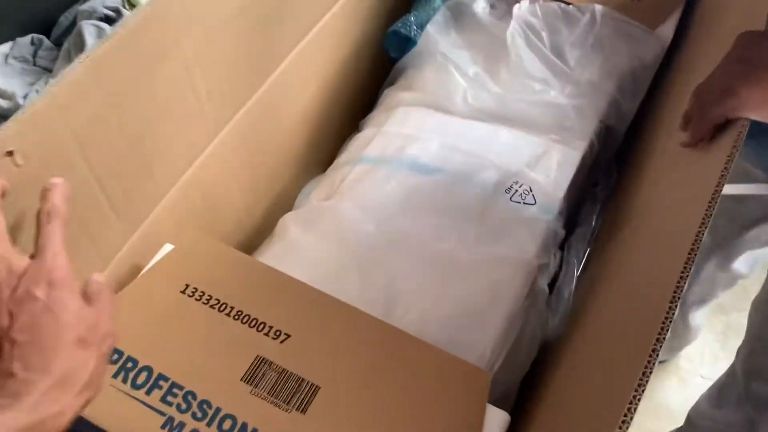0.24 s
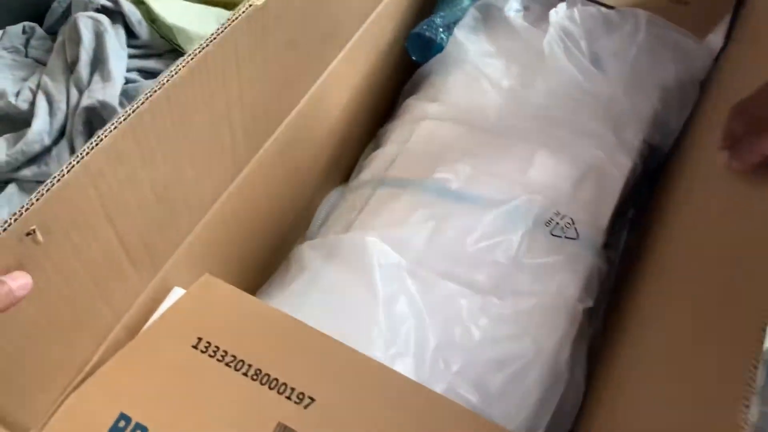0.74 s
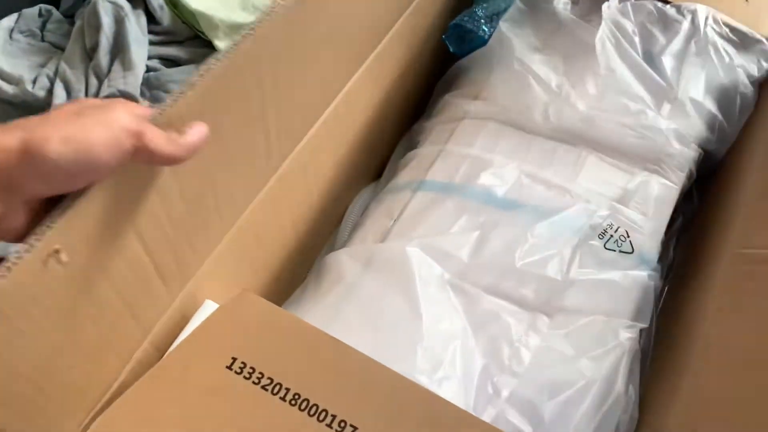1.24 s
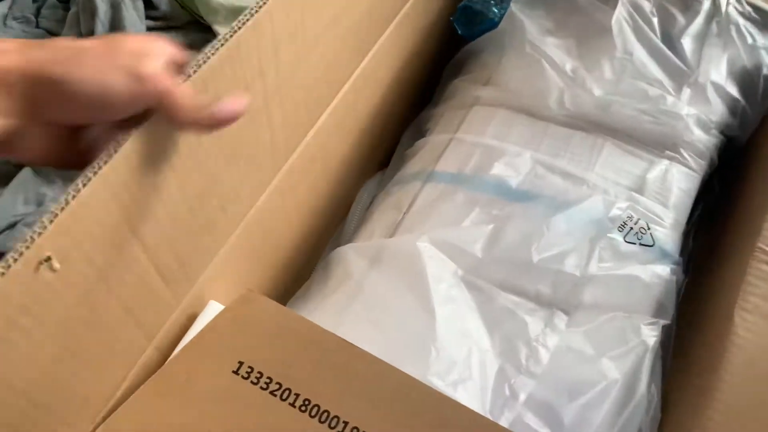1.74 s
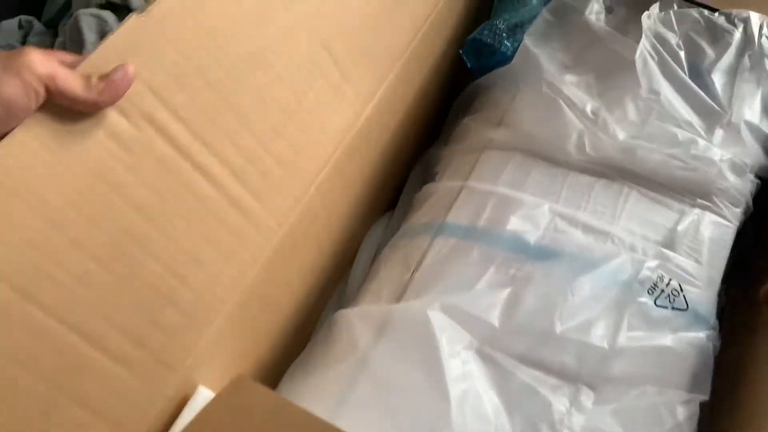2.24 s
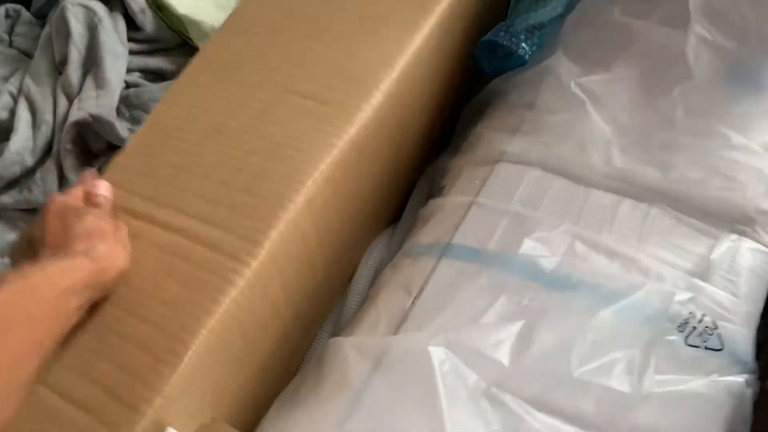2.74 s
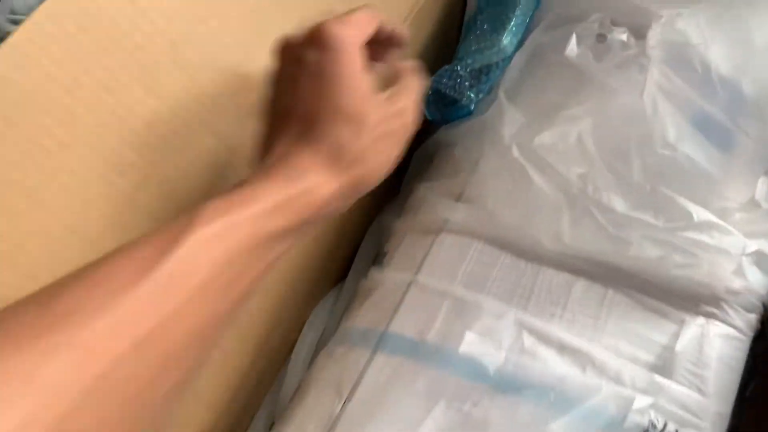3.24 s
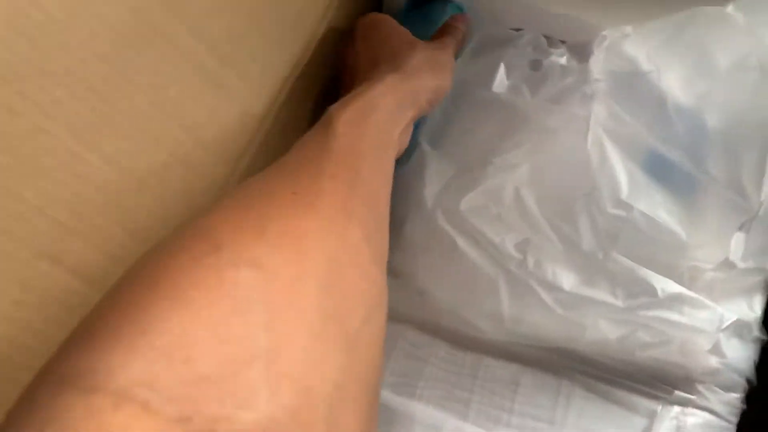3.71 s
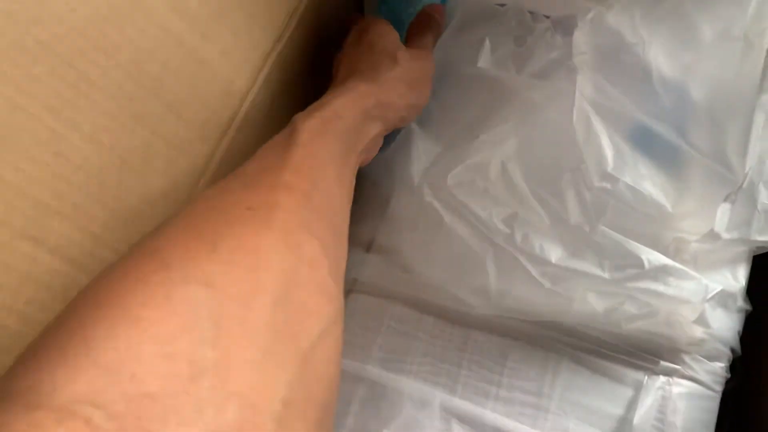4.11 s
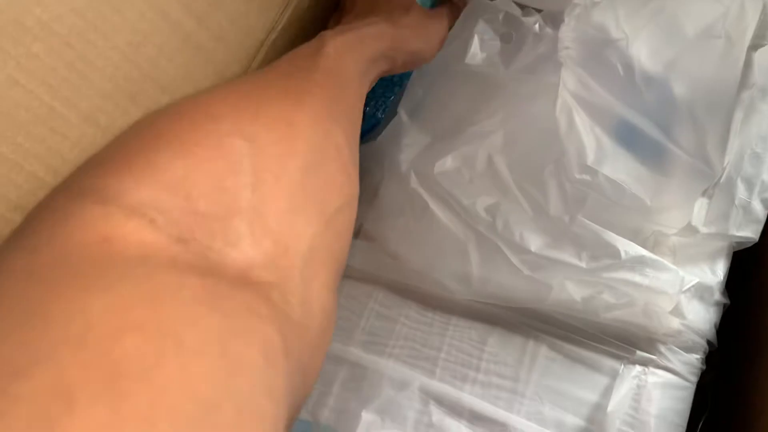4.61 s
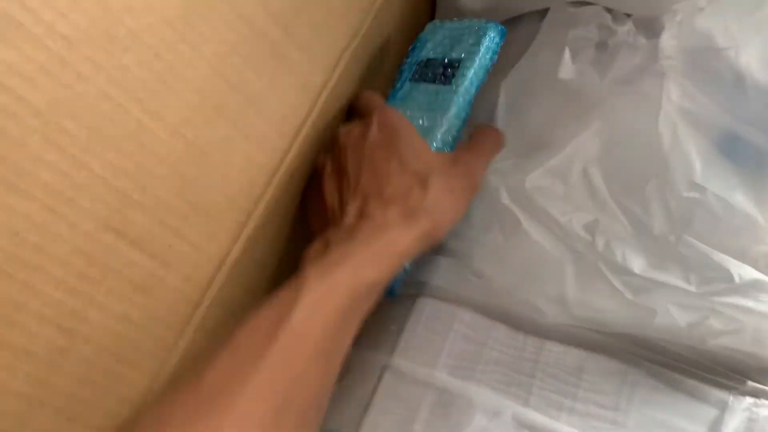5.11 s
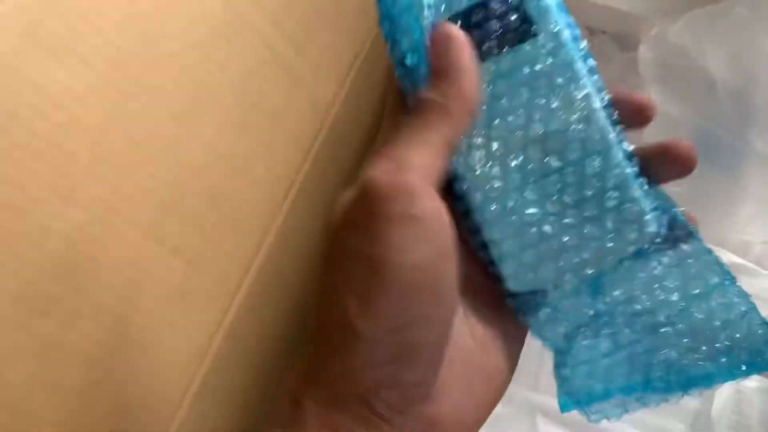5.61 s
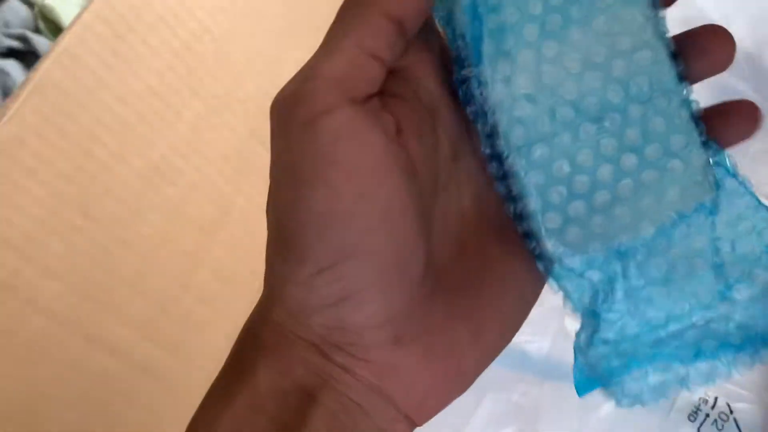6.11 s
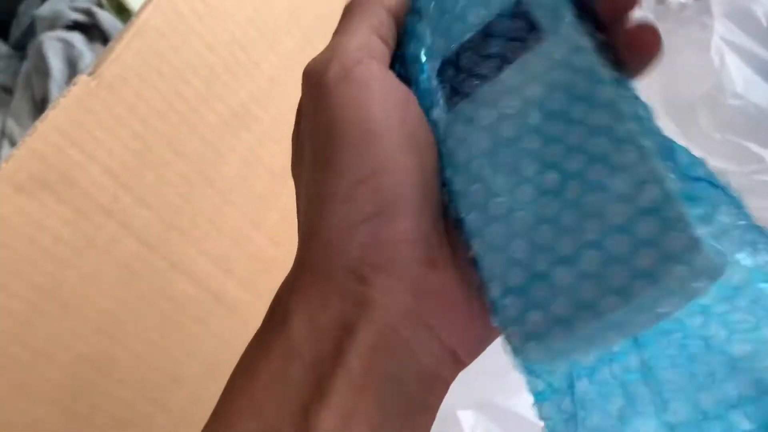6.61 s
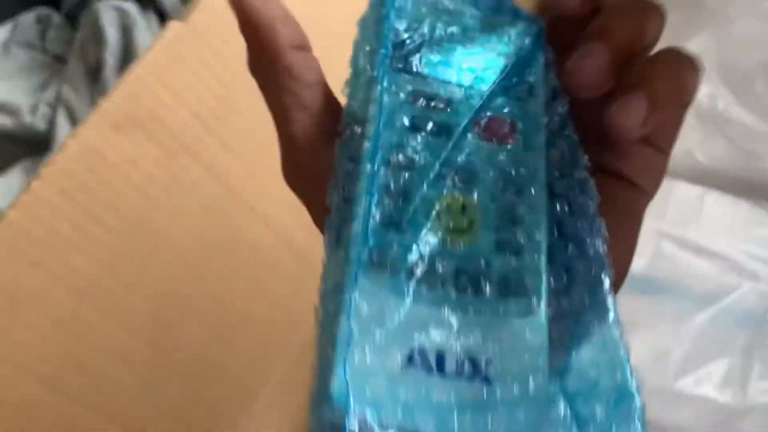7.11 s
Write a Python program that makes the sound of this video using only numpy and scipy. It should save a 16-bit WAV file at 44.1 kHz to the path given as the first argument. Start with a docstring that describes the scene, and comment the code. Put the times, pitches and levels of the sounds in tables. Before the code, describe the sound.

Close, uneven rustling of plastic sheeting mixes with cardboard scrapes and dull, boomy knocks as a box is pushed open by hand. Two quick bubble wrap pops are followed by a louder third and a few thumps. After that the wrap is handled with a crisp crackle, finishing on several rubs and one snap. The small room sounds dry and muted, with a low rumble throughout.

```python
"""Hands unpack a cardboard box in a soft-furnished room, close to one microphone.
From the start, film crinkles and snaps as creases flip, skin slides on the flaps, and the box walls
scuff and boom under shoves and knocks. From 2.3 s a cupped hand rubs the wrap now and then, ringing
a hollow. At 4.1-4.7 s three bubble-wrap pockets burst; from 4.9 s the stiffer wrap crackles in the hand.
A run of rubs and a snap end it at 7.3 s. Throughout: a short, dull room tail and a deep rumble."""
import sys
import numpy as np
from scipy import signal
from scipy.fft import rfft, irfft, next_fast_len
from scipy.io import wavfile

SR = 44100
rng = np.random.default_rng(int(sys.argv[2]) if len(sys.argv) > 2 else 0)


def wav_out(sig):
    """Save sig, one row per channel (or a flat mono array), as 16-bit PCM at SR to the path in sys.argv[1]."""
    wavfile.write(sys.argv[1], SR, np.round(np.clip(np.atleast_2d(sig).T, -1, 1) * 32767).astype(np.int16))


N = 324135

# hand movements: (full-speed time [s], run-up [s], hold [s], film level [dB], skin level [dB])
HAND_STROKES = [(.085, 0.017, 0.053, -51, -51.5), (.215, 0.025, 0.2, -47, -50),
                (.535, 0.11, 0.017, -44, -44.5), (.835, 0.072, 0.18, -41.5, -37.5),
                (1.137, 0.022, .25, -44.5, -54), (1.6, 0.11, 0.021, -52, -53),
                (1.72, 0.17, 0.035, -37.5, -34), (1.946, 0.32, 0.048, -49, -54),
                (2.14, 0.044, 0.004, -47, -43), (2.325, 0.18, 0.005, -46, -37.5),
                (2.44, 0.012, 0.046, -38.5, -64), (2.525, 0.038, 0.009, -29, -45),
                (2.69, 0.17, 0.037, -26.5, -42), (2.85, 0.035, 0.15, -41.5, -50),
                (3.322, 0.057, 0.0089, -50.5, -55), (3.43, 0.0096, 0.013, -49, -44),
                (3.69, 0.17, 0.0062, -43.5, -49), (3.975, 0.15, 0.0091, -43, -59),
                (4.49, 0.34, 0.011, -38.5, -54), (4.61, 0.14, 0.01, -37, -49),
                (4.87, 0.28, 0.04, -30, -39.5), (5.014, 0.27, 0.0045, -32, -59),
                (5.073, 0.031, 0.0015, -37, -44), (5.208, .1, 0.14, -37.5, -51),
                (5.388, 0.033, 0.015, -33, -53), (5.53, 0.39, 0.031, -41, -39),
                (5.86, 0.16, 0.061, -40.5, -44.5), (6.24, 0.16, 0.019, -36.5, -50),
                (6.4, 0.14, .2, -40.5, -49), (6.72, 0.11, 0.0076, -35.5, -50),
                (7.214, 0.042, 0.024, -35, -41), (7.34, 0.12, .02, -49, -29.5)]
# floor between strokes: (time [s], film level [dB], skin level [dB])
STROKE_FLOOR = [(0, -64, -86), (.5, -60, -53.5), (1.502, -58, -55.5), (2.4, -50.5, -56), (3.0, -45, -49.5),
                (3.2, -62, -55), (3.7, -46, -51), (4.25, -47, -55.5), (4.7, -60, -50), (5.12, -48, -81),
                (5.72, -45, -64), (6.0, -45, -49), (6.8, -32.5, -45.5), (7.1, -42, -50), (7.35, -54, -42)]
# film crinkle: (frequency [Hz], level [dB])
FILM_SPECTRUM = [(700, -12.5), (1500, -6), (3000, -4), (6000, -4.5), (9000, -2.5), (13000, -2.5),
                 (16000, -2.5)]
# creases flipping: (time [s], level [dB], centre [Hz])
CREASE_SNAPS = [(0.069, -35, 6040), (0.3196, -20, 5350), (0.322, -19, 6820), (0.34, -24, 3930),
                (0.482, -23, 5230), (0.497, -19, 4600), (0.5097, -14, 3530), (0.52, -18, 2560),
                (0.539, -23, 5200), (1.111, -35.5, 7500), (1.1335, -20.5, 3870), (1.3568, -18.5, 2000),
                (1.5643, -24.5, 4930), (1.603, -6, 7340), (2.1817, -30, 8900), (2.5045, -17, 6780),
                (2.601, -11, 7500), (2.677, -10, 8050), (3.061, -28, 2420), (3.6525, -27, 3950),
                (4.219, -31, 6500), (4.395, -23.5, 3860), (4.581, -19, 3680), (4.938, -9, 8000),
                (5.02, -12.5, 6660), (5.6305, -22, 3970), (6.189, -21, 8820), (6.4708, -27, 4260),
                (6.715, -24, 5500), (7.3197, -7.5, 2100)]
# air pockets bursting: (time [s], level [dB], torn-film mode [Hz])
BUBBLE_POPS = [(4.0586, -6.5, 8300), (4.1173, -5, 9400), (4.7343, 0.5, 7200)]
# modes common to all pockets: (frequency [Hz], width [Hz], level [dB])
POCKET_MODES = [(1330, 780, -2), (4670, 2900, -0.5), (13500, 4600, -13)]
# blows on the box: (time [s], level [dB], panel mode [Hz], T60 [s], hollow re boom [dB])
BOX_KNOCKS = [(0.221, -33.5, 300, 0.064, -3), (.323, -27, 205, 0.049, -1), (0.341, -21, 86.5, 0.055, -11),
              (0.511, -19.5, 150, 0.078, -16), (.535, -29.5, 255, 0.095, -13),
              (0.895, -30.5, 118, 0.16, -19), (1.141, -27.5, 320, 0.085, -6),
              (1.297, -23.5, 147, 0.12, -28), (1.339, -32, 153, 0.042, 5), (1.362, -10.5, 252, 0.061, -16),
              (1.397, -18, 140, 0.055, -17), (1.422, -14.5, 266, 0.08, -31), (1.568, -18, 290, 0.073, -16),
              (1.604, -10, 178.5, 0.034, -39), (1.945, -37.5, 309, 0.2, 4), (2.04, -28.5, 272, 0.076, -35),
              (2.211, -28, 103, 0.055, -14), (2.333, -46, 250, 0.027, 4), (2.426, -31, 112, 0.24, -7),
              (3.345, -35, 257, 0.23, -6), (3.416, -12, 186, 0.042, -5), (3.497, -27, 116.5, 0.099, 2.5),
              (3.525, -34, 197, 0.083, 8), (4.056, -26, 239, 0.089, 1), (4.116, -22.5, 238, 0.051, -1),
              (4.161, -9, 199, 0.036, -30), (4.184, -10.5, 75, 0.029, -43), (4.333, -23, 90.5, 0.063, -42),
              (4.832, -17.5, 271, 0.055, -2.5), (4.847, -9.5, 221, 0.057, -5.5),
              (4.922, -8.5, 131, 0.024, -29), (5.425, -18, 84.4, 0.097, 3), (5.811, -36, 249, 0.12, 5)]
# walls and cavity: (frequency [Hz], width [Hz], level [dB])
BOX_MODES = [(95, 27, 0), (182, 57, -4.5), (242.5, 58, 1), (353, 440, -13)]
# air space and flaps under a hard knock: (frequency [Hz], width [Hz], level [dB])
HOLLOW_MODES = [(445, 70, 7.5), (880, 516, 9.5), (1080, 460, 10.5), (1380, 560, -1.5)]
# shoves and tugs: (full-force time [s], run-up [s], hold [s], scuff level [dB], boom level [dB])
BOX_SHOVES = [(.09, 0.24, 0.18, -62.5, -47.5), (.34, 0.15, 0.093, -43, -39.5),
              (.512, 0.017, 0.027, -39.5, -31.5), (1.33, 0.2, 0.088, -41, -32),
              (1.6, 0.021, .01, -42.5, -38), (1.95, 0.055, 0.014, -51, -49.5),
              (2.14, 0.15, 0.087, -46, -43), (2.335, 0.088, 0.0092, -42, -33.5),
              (2.46, 0.15, 0.094, -39.5, -41), (2.69, 0.048, 0.044, -34, -33),
              (2.86, 0.087, 0.078, -65, -43.5), (3.2, 0.12, 0.011, -41.5, -61),
              (3.43, 0.045, 0.21, -54, -46.5), (3.95, 1, 0.016, -49.5, -67), (4.445, 0.15, 0.088, -48, -44),
              (4.852, 0.06, 0.039, -34, -26), (5.2, 0.9, 0.048, -45, -52), (5.433, 0.01, 0.0094, -69, -29),
              (5.57, 0.07, 0.017, -42, -45), (5.822, 0.034, 0.043, -41.5, -43.5),
              (6.016, 0.04, .02, -50.5, -44.5), (6.63, 0.083, 0.01, -31.5, -42.5),
              (7.169, 0.16, 0.0058, -46.5, -35), (7.32, 0.078, .03, -33.5, -28)]
# floor between shoves: (time [s], scuff level [dB], boom level [dB])
SHOVE_FLOOR = [(0, -58, -74), (1.0, -53.5, -54), (2.0, -51.5, -55), (3.0, -52.5, -46), (4.1, -60, -55),
               (4.7, -40.5, -45), (5.3, -55.5, -53), (6.2, -57, -55), (6.75, -49, -47.5),
               (7.0, -55.5, -57.5), (7.35, -35, -41)]
# cardboard scuff: (frequency [Hz], level [dB])
BOARD_SPECTRUM = [(250, -9), (450, 3), (900, 3), (1500, 0.5), (2500, -6), (4500, -8)]
# skin on the flaps: (frequency [Hz], level [dB])
SKIN_SPECTRUM = [(1500, -34), (3300, -17), (5400, -2), (7300, 0), (9500, -8), (16500, -24)]
# cupped hand on the wrap: (time [s], length [s], hollow mode [Hz], level [dB])
HAND_RUBS = [(2.296, 0.057, 900, -40.5), (2.8, 0.13, 500, -45), (2.955, 0.014, 2940, -40.5),
             (3.184, 0.065, 3220, -50.5), (4.795, 0.083, 2500, -35.5), (4.95, 0.11, 158, -37.5),
             (4.97, .115, 795, -45.5), (5.81, 0.077, 498, -40), (5.808, 0.11, 1110, -48.5),
             (6.005, 0.05, 624, -47.5), (6.611, 0.058, 590, -32), (7.15, 0.057, 313, -35),
             (7.238, 0.017, 1380, -32), (7.262, 0.05, 805, -29), (7.297, 0.053, 1490, -24.5),
             (7.245, 0.14, 340, -30.5), (7.314, 0.036, 1970, -26.5), (7.312, 0.036, 610, -25.5)]
# hands stop: (start [s], length [s], drop [dB])
HAND_PAUSES = [(0.417, 0.058, 9), (2.15, 0.036, 8), (2.35, 0.064, 11), (4.2, 0.059, 5.5), (5.107, 0.044, 4)]
# deep rumble: (time [s], level [dB])
RUMBLE_LEVELS = [(0.0, -45.5), (0.35, -47), (1.0, -52.5), (1.23, -45.5), (2.41, -49.5), (3.7, -43.5),
                 (3.93, -53.5), (4.15, -36.5), (4.36, -54.5), (4.95, -29), (5.08, -55), (5.95, -41),
                 (6.04, -50), (7.35, -50.5)]


def film_crinkle(rate_per_s=600, spread_db=2.5, wrap_lifted_s=4.93):
    """Small creases flip at random pitches over friction hiss; less hiss once the wrap is lifted."""
    flips = impulse_sizes(spread_db) * (rng.random(N) < rate_per_s / SR)
    band = rng.integers(0, 7, N)
    ticks = sum(resonance(flips * (band == k) + 1e-18, hz, 0.53 * hz) / np.sqrt(hz)
                for k, hz in enumerate(np.geomspace(3800, 14500, num=7)))
    clumps = from_db(1.83 * drift(rate_hz=52))
    hiss = np.where(np.arange(N) / SR < wrap_lifted_s, 2.5, 1.3) * rng.standard_normal(N)
    return coloured(clumps * (rms_one(ticks) + hiss), FILM_SPECTRUM, patch_db=1.76, patch_hz=3.7)


def crease_snaps(size=2000):
    """A crease flips: a broad crack around its own pitch, sharp front, short tail."""
    out = np.zeros(N)
    tail = decay(t60_s=0.011, rise_s=0.0001, size=size)
    front = decay(t60_s=0.002, rise_s=0.0001, size=size)
    for time_s, db, hz in CREASE_SNAPS:
        flip = rng.standard_normal(size) * (tail + 0.43 * front)
        flip[2] += 5.5   # one clean click
        crack = resonance(flip, hz, hz / 2) + 0.5 * resonance(flip, 910, 3900)
        crack += 0.13 * (hz / 6000) ** 2 * resonance(flip, 13000, 6000)
        add(out, time_s, from_db(db) * peak_one(crack))
    return out


def bubble_pops(size=2000):
    """A pocket bursts: click and puff ring the pocket modes and the torn film."""
    out = np.zeros(N)
    for time_s, db, film_hz in BUBBLE_POPS:
        puff = rng.standard_normal(size) * decay(t60_s=0.012, rise_s=0.00035, size=size)
        puff[[4, 9]] += 2.5, -2.5   # pressure step out and back
        burst = modes(puff, POCKET_MODES + [(film_hz, 1200, 1.5)])
        add(out, time_s, from_db(db) * peak_one(burst))
    return out


def box_knocks(size=6000):
    """A blow rings the struck panel and the lowest wall mode; a hard one also rings the hollow."""
    out = np.zeros(N)
    t = np.arange(size) / SR
    warped_s = t + 0.0023 * (1 - np.exp(-t / 0.0025))   # bending waves: highs arrive first, pitch sags
    for time_s, db, panel_hz, t60_s, hollow_db in BOX_KNOCKS:
        panel = np.sin(2 * np.pi * panel_hz * warped_s) * decay(t60_s, rise_s=0.0039, size=size)
        wall = np.sin(2 * np.pi * BOX_MODES[0][0] * t) * decay(0.64 * t60_s, rise_s=0.0013, size=size)
        impact = rng.standard_normal(size) * decay(0.5 * t60_s, rise_s=0.00043, size=size)
        hollow = from_db(hollow_db) * peak_one(modes(impact, HOLLOW_MODES))
        add(out, time_s, from_db(db) * (panel + 0.54 * wall + hollow))
    return out


def wall_boom():
    """Soft, lumpy pushes from handling ring the box modes."""
    pushes = grains(rate_per_s=200, spread_db=1, clump_db=2.5, clump_hz=28, hiss_gain=0.88)
    return modes(signal.sosfilt(signal.butter(2, 480, fs=SR, output="sos"), pushes), BOX_MODES)


def board_scuff():
    """Cardboard slips in coarse, slow clumps."""
    slips = grains(rate_per_s=900, spread_db=1, clump_db=4.5, clump_hz=12.4, hiss_gain=1)
    return coloured(slips, BOARD_SPECTRUM, patch_db=2, patch_hz=13)


def skin_slide():
    """Skin on the flaps: dense, fine slips merge into a bright hiss."""
    slips = grains(rate_per_s=5400, spread_db=-0.5, clump_db=2, clump_hz=70, hiss_gain=0.82)
    return coloured(slips, SKIN_SPECTRUM, patch_db=0.3, patch_hz=29)


def hand_rubs(size=6000):
    """Coarse stick-slip swells and fades under a cupped hand; only the hollow's band sounds."""
    out = np.zeros(N)
    slips = grains(rate_per_s=870, spread_db=2, clump_db=2, clump_hz=52, hiss_gain=0.33)
    for k, (time_s, length_s, hz, db) in enumerate(HAND_RUBS):
        swell = np.sin(np.pi * np.clip(np.arange(size) / SR / length_s, 0, 1)) ** 0.37
        ring = slips[k * size:(k + 1) * size]
        for _ in range(2):
            ring = resonance(ring, hz, 0.34 * hz)
        ring /= np.sqrt(np.mean(ring[swell > 0.01] ** 2))
        add(out, time_s, from_db(db) * swell * ring)
    return out


def room_tail(x, t60_s=0.049, gap_s=0.003, cutoff_hz=4300):
    """Dense, dull reflections from box walls and furniture."""
    t = np.arange(SR // 4) / SR
    tail = rng.standard_normal(len(t)) * from_db(-60 * t / t60_s) * (t > gap_s)
    tail = signal.sosfilt(signal.butter(1, cutoff_hz, fs=SR, output="sos"), tail)
    return signal.fftconvolve(x, tail / np.sqrt(np.sum(tail ** 2)))[:N]


def deep_rumble():
    """Narrow bass noise that swells and sinks."""
    noise = resonance(rng.standard_normal(N), hz=51.7, width_hz=13.4)
    return gain_curves(RUMBLE_LEVELS)[0] * rms_one(noise)


def gesture_gains(moves, floor, fall_db_per_s, run_up_db=20):
    """One gain per level column: each move runs up, holds and falls; powers add to the floor."""
    t = np.arange(0, N + 64, 64) / SR
    power = 0
    for time_s, run_up_s, hold_s, *levels_db in moves:
        early_db = run_up_db * np.maximum(time_s - t, 0) / run_up_s
        late_db = np.c_[fall_db_per_s] * np.maximum(t - time_s - hold_s, 0)
        power += from_db(np.c_[levels_db] - early_db - late_db) ** 2
    return [np.sqrt(np.interp(np.arange(N) / SR, t, moving) + rest ** 2)
            for moving, rest in zip(power, gain_curves(floor))]


def pause_gain(edge_s=0.007):
    """Dips while the hands stop."""
    t = np.arange(N) / SR
    db = 0
    for start_s, length_s, drop_db in HAND_PAUSES:
        inside_s = np.minimum(t - start_s, start_s + length_s - t)
        db -= drop_db * np.clip(inside_s / edge_s + 0.5, 0, 1)
    return from_db(db)


def gain_curves(rows):
    """One gain per level column, interpolated in dB."""
    times_s, *levels_db = np.transpose(rows)
    return [from_db(np.interp(np.arange(N) / SR, times_s, db)) for db in levels_db]


def grains(rate_per_s, spread_db, clump_db, clump_hz, hiss_gain):
    """Random slips plus friction hiss, swelling in clumps."""
    slips = impulse_sizes(spread_db) * (rng.random(N) < rate_per_s / SR)
    clumps = from_db(clump_db * drift(clump_hz))
    return clumps * (rms_one(slips) + hiss_gain * rng.standard_normal(N))


def impulse_sizes(spread_db):
    """Uneven amplitudes of random sign."""
    return from_db(spread_db * np.minimum(rng.exponential(1, N), 5)) * rng.choice([-1, 1], N)


def coloured(x, spectrum, patch_db, patch_hz):
    """Applies a spectrum; 12 bands swell independently as the folds shift; rms 1."""
    size = next_fast_len(N)
    log_hz = np.log(np.arange(size // 2 + 1) * SR / size + 1e-3)
    hz, db = np.transpose(spectrum)
    shaped = rfft(x, size) * from_db(np.interp(log_hz, np.log(hz), db, left=-80, right=-80))
    centres, step = np.linspace(*np.log(hz[[0, -1]]), num=12, retstep=True)
    windows = (np.clip(1 - abs(log_hz - centre) / step, 0, 1) for centre in centres)
    bands = (irfft(shaped * window, size)[:N] for window in windows)
    return rms_one(sum(band * from_db(patch_db * drift(patch_hz)) for band in bands))


def modes(x, table):
    """Parallel resonances, alternating signs; rms 1."""
    return rms_one(sum((-1) ** k * from_db(db) * resonance(x, hz, width_hz)
                       for k, (hz, width_hz, db) in enumerate(table)))


def resonance(x, hz, width_hz):
    """Two-pole band-pass, peak gain 1."""
    r = np.exp(-np.pi * width_hz / SR)
    feedback = [1, -2 * r * np.cos(2 * np.pi * hz / SR), r * r]
    return signal.lfilter(np.array([1, 0, -1]) * (1 - r * r) / 2, feedback, x)


def drift(rate_hz):
    """Two-pole low-passed noise, rms 1."""
    r = np.exp(-2 * np.pi * rate_hz / SR)
    return rms_one(signal.lfilter([1], [1, -2 * r, r * r], rng.standard_normal(N + SR))[SR:])


def decay(t60_s, rise_s, size):
    """Short rise, exponential fall."""
    t = np.arange(size) / SR
    return (1 - np.exp(-t / rise_s)) * from_db(-60 * t / t60_s)


def add(out, time_s, burst):
    start = round(time_s * SR)
    out[start:start + len(burst)] += burst[:N - start]


def from_db(db):
    return 10 ** (np.asarray(db) / 20)


def rms_one(x):
    return x / np.sqrt(np.mean(x ** 2) + 1e-20)


def peak_one(x):
    return x / np.max(abs(x))


def scene():
    """Handling, room and rumble; one microphone on both channels."""
    film_gain, skin_gain = gesture_gains(HAND_STROKES, STROKE_FLOOR, fall_db_per_s=[191, 208])
    scuff_gain, boom_gain = gesture_gains(BOX_SHOVES, SHOVE_FLOOR, fall_db_per_s=[201, 224])
    friction = film_gain * film_crinkle() + skin_gain * skin_slide() + scuff_gain * board_scuff()
    rumble = deep_rumble()
    handling = pause_gain() * (friction + boom_gain * wall_boom())
    direct = handling + crease_snaps() + bubble_pops() + box_knocks() + hand_rubs()
    return np.tile(direct + from_db(-18.5) * room_tail(direct) + rumble, (2, 1))


def record(dry, low_cut_hz=42, ceiling=0.95, high_cut_hz=15900):
    """High-pass, soft limiter, steep low-pass."""
    x = signal.sosfilt(signal.butter(4, low_cut_hz, "high", fs=SR, output="sos"), dry)
    x = x / (1 + (abs(x) / ceiling) ** 4) ** 0.25
    return signal.sosfilt(signal.ellip(12, 0.5, 70, high_cut_hz, fs=SR, output="sos"), x)


dry = scene()
out = record(dry)
wav_out(out)
```